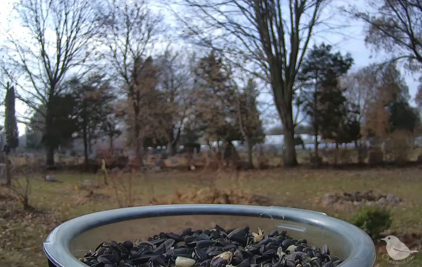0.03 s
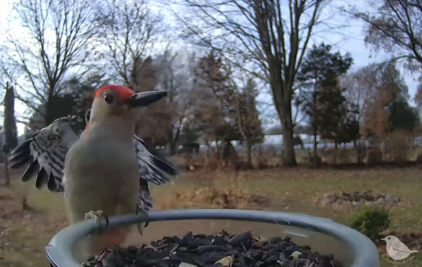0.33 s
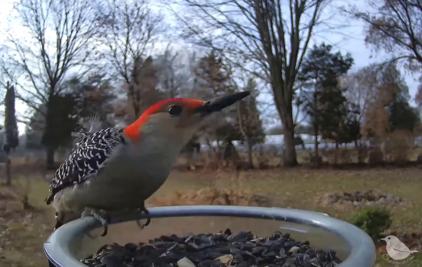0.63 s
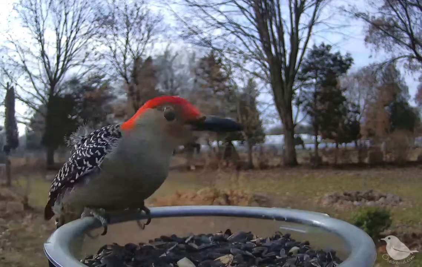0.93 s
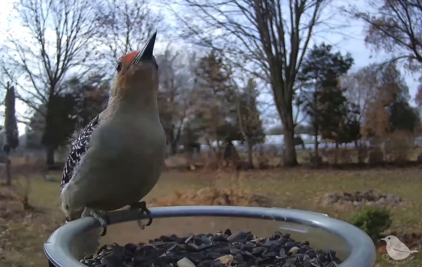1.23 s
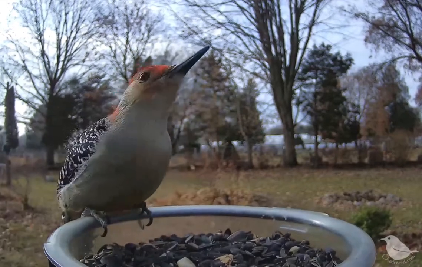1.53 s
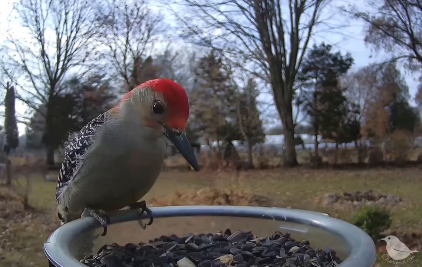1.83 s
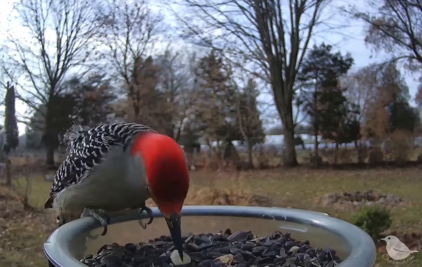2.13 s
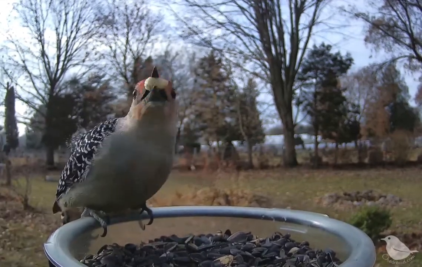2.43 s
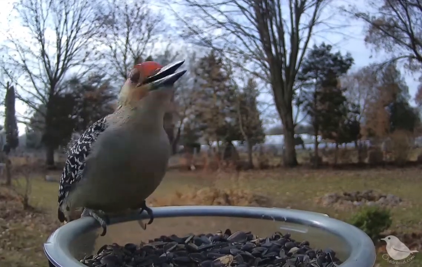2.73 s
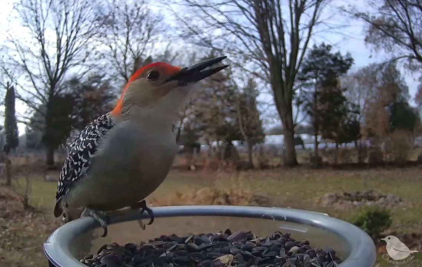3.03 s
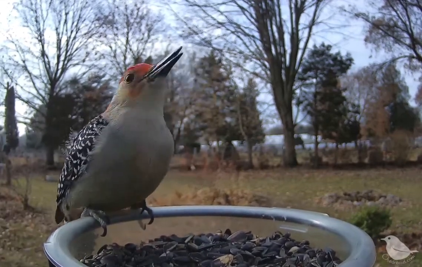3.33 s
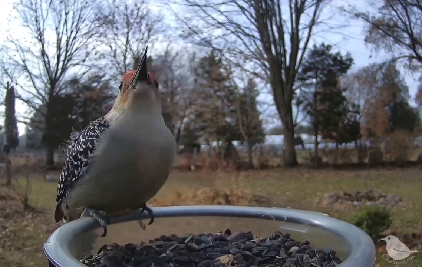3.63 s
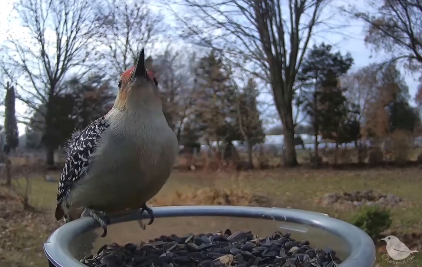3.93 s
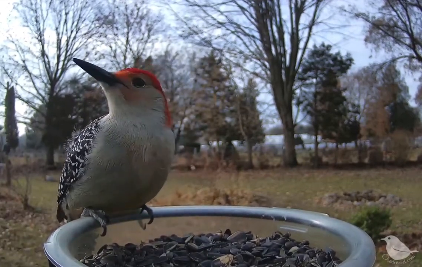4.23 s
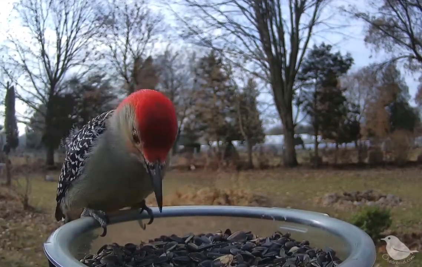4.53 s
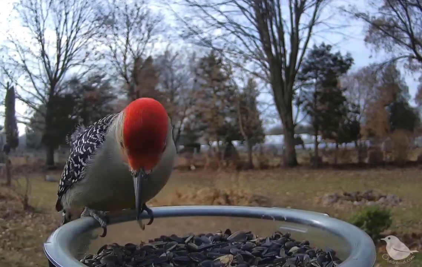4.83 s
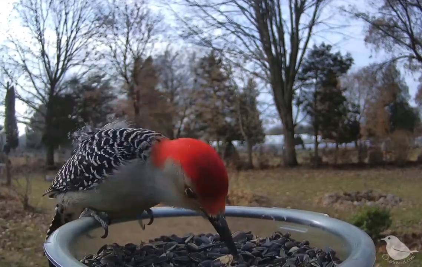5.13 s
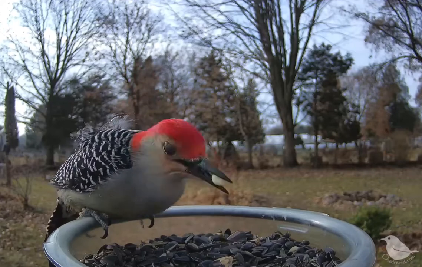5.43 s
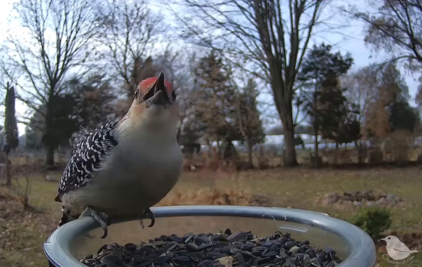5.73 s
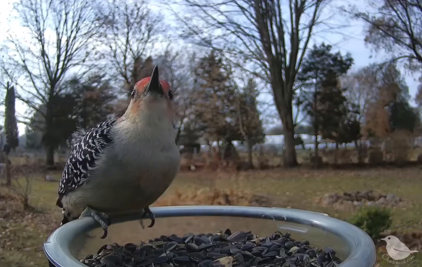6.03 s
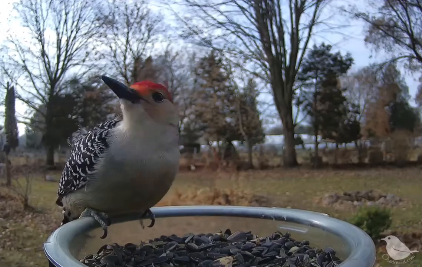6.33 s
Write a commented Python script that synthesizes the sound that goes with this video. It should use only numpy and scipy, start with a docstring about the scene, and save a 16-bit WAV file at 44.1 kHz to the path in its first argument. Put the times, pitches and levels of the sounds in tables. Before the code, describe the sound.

A woodpecker lands on a plastic feeder dish with a brief flutter, low thumps and a loud clatter of claws that overloads the microphone inside the feeder. A claw slips with a short squeak, then the beak taps and stirs seeds in two light spells. Small birds chirp faintly around the yard over a soft wind, a low hum, a far engine and a slowly approaching car. A nearer bird gives two short harsh calls at the end.

```python
"""In a yard, a woodpecker flaps onto the plastic dish of a camera feeder. Its claws strike the rim and
slip once, and its beak picks among the seeds; every contact excites the resonant modes of the dish.
Small birds chirp in the trees and a nearer bird calls harshly, over a light wind, the tyre noise of a
car nearing on a distant road, a far engine and a low hum. The microphone sits in the feeder itself,
passes nothing above the mid treble and overloads on the claws."""
import sys
import numpy as np
from scipy import signal
from scipy.fft import rfft, irfft
from scipy.io import wavfile
from scipy.ndimage import uniform_filter1d

SR = 44100
rng = np.random.default_rng(int(sys.argv[2]) if len(sys.argv) > 2 else 0)


def put_to_file(sound):
    """Save the sound as 16-bit audio at rate SR, in the file named by the first command-line argument."""
    columns = np.atleast_2d(sound).T  # one column per channel
    safe = np.clip(columns, -1, 1)
    whole_steps = np.round(safe * 32767)
    wavfile.write(sys.argv[1], SR, whole_steps.astype(np.int16))


N = 286650
TIME = np.arange(N) / SR
BAND_HZ = 6400  # upper limit of the microphone


def undb(db):
    """Amplitude ratio for a level in decibels."""
    return 10 ** (np.asarray(db) / 20)


def unit(x):
    """Normalisation to an rms of 1."""
    return x / np.sqrt(np.mean(x ** 2) + 1e-18)


def add(out, start, x):
    """Superposition: x is mixed into out from a start in seconds."""
    i = max(int(start * SR), 0)
    out[i:i + len(x)] += x[:N - i]


def walk(rate_hz):
    """Smoothed random fluctuation with a standard deviation near 1."""
    k = max(int(SR / rate_hz), 1)
    steps = np.repeat(rng.standard_normal(N // k + 1), k)
    return 1.5 * uniform_filter1d(uniform_filter1d(steps, k), k)[:N]


def band(x, hz, width_hz):
    """A second-order resonator with unit gain at its centre."""
    return signal.lfilter(*signal.iirpeak(min(hz, SR / 3), hz / width_hz, fs=SR), x)


def noise(colour):
    """Spectral shaping: band-limited noise of rms 1 that follows (Hz, dB) points."""
    hz, db = np.transpose(colour)
    f = np.maximum(np.fft.rfftfreq(N, 1 / SR), 1)
    shape = undb(np.interp(np.log(f), np.log(hz), db))
    limits = (f < BAND_HZ) * np.minimum(f / hz[0], 1) ** 2
    return unit(irfft(rfft(rng.standard_normal(N)) * shape * limits, N))


# Spectrum of the yard's air. Each row: frequency in Hz, relative spectral level in dB.
AIR_SPECTRUM = [(20, -1.5), (35, -5), (55, 1), (110, 1.5), (150, 0.5), (220, -5), (320, -8.5), (480, -11),
                (750, -9), (1100, -5.5), (1700, -8.5), (3000, -9), (4500, -21.5), (6300, -30.5)]
# Soft gusts. Each row: peak time in seconds, width in seconds, rumble change in dB, rush change in dB.
GUSTS = [(2.35, 0.44, -0.5, 2.5), (5.0, 1, 2.5, 0.86)]


def wind(level_db=-32.5, sway_db=0.43, buffet_db=2):
    """Amplitude modulation of noise: the breeze buffets the low rumble and sways the rush above it."""
    air = noise(AIR_SPECTRUM)
    rumble = signal.sosfiltfilt(signal.butter(2, 250, fs=SR, output="sos"), air)
    rumble_db, rush_db = buffet_db * walk(16), sway_db * walk(7)
    for peak, width, rumble_change, rush_change in GUSTS:
        gust = np.exp(-((TIME - peak) / width) ** 2)
        rumble_db += rumble_change * gust
        rush_db += rush_change * gust
    return undb(level_db) * (rumble * undb(rumble_db) + (air - rumble) * undb(rush_db))


# Tones of a far machine. Each row: multiple of the base frequency, level in dB.
HUM_TONES = [(1, -38), (2, -46.5), (3.5, -46.5)]


def hum(base_hz=58.45, rise_hz_per_s=0.42, wander=0.00397, swell_db=1.2):
    """Tones locked to one machine's speed waver together and rise as it slowly speeds up."""
    hz = (base_hz + rise_hz_per_s * TIME) * (1 + wander * walk(2))
    phase = 2 * np.pi * np.cumsum(hz) / SR
    return sum(np.sqrt(2) * undb(db + swell_db * walk(4)) * np.sin(k * phase) for k, db in HUM_TONES)


def engine(firing_hz=80.4, sag_hz_per_s=0.66, idle_db=-43.5, load_db=11.5, octave_db=-18, waver_db=1.5):
    """Periodic firing: a far engine's tone and its octave sag in pitch and swell under load."""
    onset_s, attack_s, hold_s, release_s = 2, 0.57, 1.15, 1.35
    load = np.interp(TIME, np.cumsum([onset_s, attack_s, hold_s, release_s]), [0, 1, 1, 0])
    db = idle_db + load_db * load + waver_db * (1 - load) * walk(3)
    phase = 2 * np.pi * np.cumsum(firing_hz - sag_hz_per_s * TIME) / SR
    return np.sqrt(2) * undb(db) * (np.sin(phase) + undb(octave_db) * np.sin(2 * phase))


# Tyre noise entering the housing. Each row: frequency in Hz, relative spectral level in dB.
TYRE_SPECTRUM = [(200, -8), (600, -12.5), (1150, 3.5), (1500, -1.5), (2050, -2.5), (2400, 2), (2620, 0.5),
                 (2850, 0), (3700, -1.5), (4020, -2.5), (4350, -12.5), (6300, -17.5)]


def car(closest_s=7.08, closest_m=23.8, closest_db=-30.5, speed_m_per_s=14.1, ground_db_per_m=0.15):
    """Spherical spreading and ground absorption: tyre noise grows louder and brighter as a car nears."""
    far_hz, near_hz, spread_octaves, flicker_db = 1330, 2750, 1.03, 0.9
    distance = np.hypot(closest_m, speed_m_per_s * (TIME - closest_s))
    nearness = closest_m / distance * undb(-ground_db_per_m * (distance - closest_m))
    bright_hz = far_hz + (near_hz - far_hz) * nearness ** 2
    spectrum, f = rfft(noise(TYRE_SPECTRUM)), np.fft.rfftfreq(N, 1 / SR)
    tyres, power = 0, 0
    for hz in 200 * 2. ** np.arange(6):
        octave = irfft(spectrum * np.maximum(1 - abs(np.log2((f + 1) / hz)), 0), N)
        weight = np.exp(-.5 * (np.log2(hz / bright_hz) / spread_octaves) ** 2)
        tyres += octave * weight * undb(flicker_db * walk(7.7))
        power += np.var(octave) * weight ** 2
    return undb(closest_db) * nearness * tyres / np.sqrt(power)


def sing(notes, partials, waver=0.11, rasp_hz=900):
    """Harmonic notes made hoarse by random modulation of frequency and amplitude."""
    out, shake, tremble = np.zeros(N), walk(rasp_hz), walk(rasp_hz)
    for start, pitch_hz, swell_db, db, hoarse in notes:
        u = np.linspace(0, 1, len(pitch_hz))
        span = int(start * SR) + np.arange(len(u))
        phase = 2 * np.pi * np.cumsum(pitch_hz * (1 + waver * hoarse * shake[span])) / SR
        voice = sum(undb(partial_db) * np.sin(k * phase) for k, partial_db in partials)
        envelope = undb(swell_db) * np.sqrt(4 * u * (1 - u))
        roughness = 1 + 0.52 * hoarse * tremble[span]
        add(out, start, undb(db) * unit(voice * envelope * roughness))
    return out


# Warbled chirps. Each row: start in seconds, length in seconds, pitch in Hz,
# rise as a fraction of the pitch, level in dB, hoarseness from 0 to 1.
CHIRPS = [(2.079, 0.076, 3500, 0.0495, -33.5, 0.38), (3.522, 0.073, 3310, -0.018, -32, 0.25)]
# A chirp arches, dips and flicks up. Each row: fraction of its length, pitch ratio.
CHIRP_CONTOUR = [(0, 0.97), (0.14, 1.08), (0.42, 0.925), (0.7, 0.98), (1, 1.07)]
# Short whistles. Each row: start in seconds, length in seconds, first and last pitch in Hz,
# level in dB, hoarseness from 0 to 1.
WHISTLES = [(2.343, 0.038, 4150, 4850, -40, 0.35), (2.39, 0.17, 6250, 6100, -48.5, 0.92),
            (3.715, 0.058, 4200, 4200, -44, 0.23), (3.763, 0.093, 4480, 4050, -43, 0.06),
            (5.008, 0.068, 3420, 3240, -31, 0.55), (5.421, 0.042, 3900, 2610, -36.5, 0.05),
            (5.53, 0.026, 4080, 3440, -38.5, 0.2)]


def small_birds(dip_db=-13.5, dip_at=0.38, dip_width=0.18):
    """Frequency modulation of a single tone: chirps warble and weaken at the dip, whistles glide."""
    notes = []
    for start, length, hz, rise, db, hoarse in CHIRPS:
        u = np.linspace(0, 1, int(length * SR))
        pitch_hz = hz * (np.interp(u, *np.transpose(CHIRP_CONTOUR)) + rise * (u - .5))
        swell_db = dip_db * np.exp(-((u - dip_at) / dip_width) ** 2)
        notes.append((start, pitch_hz, swell_db, db, hoarse))
    for start, length, first_hz, last_hz, db, hoarse in WHISTLES:
        notes.append((start, np.linspace(first_hz, last_hz, int(length * SR)), 0, db, hoarse))
    return sing(notes, partials=[(1, 0)])


# Calls of a nearer bird. Each row: start in seconds, length in seconds, fundamental in Hz,
# level in dB, hoarseness from 0 to 1.
CALLS = [(6.012, 0.055, 1300, -27.5, 0.42), (6.303, 0.072, 1370, -21.5, 0.62)]
# Spectrum of a call. Each row: harmonic number, relative level in dB.
CALL_HARMONICS = [(2, 5.5), (3, -1), (4, -14.5)]


def harsh_bird(scoop=0.03, fade_db=-8):
    """Harmonics of a missing fundamental form rasping calls that scoop in pitch and fade."""
    notes = []
    for start, length, hz, db, hoarse in CALLS:
        u = np.linspace(0, 1, int(length * SR))
        pitch_hz = hz * (1 + scoop * np.cos(2 * np.pi * np.sqrt(u)))
        notes.append((start, pitch_hz, fade_db * u, db, hoarse))
    return sing(notes, CALL_HARMONICS, waver=0.114, rasp_hz=950)


def birds(echo_s=0.087, echo_db=-11, t60=.33, tail_db=-8):
    """Reflection and scattering: the voices return as an echo across the yard and a tail from trees."""
    voices = small_birds() + harsh_bird()
    t = TIME[:SR // 2]
    trees = rng.standard_normal(len(t)) * np.exp(-np.log(1000) * t / t60)
    echo = np.interp(TIME - echo_s, TIME, voices)
    tail = signal.fftconvolve(voices, trees / np.linalg.norm(trees))[:N]
    return voices + undb(echo_db) * echo + undb(tail_db) * tail


# Rush of the feathers. Each row: frequency in Hz, relative spectral level in dB.
FEATHER_SPECTRUM = [(25, 11), (90, -8.5), (250, -1.5), (500, -3), (1100, -9), (1700, -11), (2800, -5.5),
                    (4200, -11), (6300, -17.5)]
# The bird's weight and wing puffs shove the feeder.
# Each row: start in seconds, level in dB, frequency in Hz, time to decay by 60 dB in seconds.
THUMPS = [(0.116, -16, 44.5, 0.056), (0.175, -8.5, 205, 0.032), (0.176, -8, 55, 0.055),
          (0.2974, -6.5, 85, 0.033)]


def landing(fold_s=0.3, wings_db=-21, wingbeat_hz=18.1, wingbeat_db=2.5, flutter_db=1.5):
    """Wingbeats modulate feather noise until the wings fold; shoves start damped feeder vibrations."""
    rise_db_per_s, fall_db_per_s = 51.5, 195
    since_fold = TIME - fold_s
    effort_db = wings_db + np.minimum(rise_db_per_s * since_fold, -fall_db_per_s * since_fold)
    beat_db = wingbeat_db * np.cos(2 * np.pi * wingbeat_hz * since_fold)
    out = noise(FEATHER_SPECTRUM) * undb(effort_db + beat_db + flutter_db * walk(159))
    t = TIME[:SR // 4]
    for start, db, hz, t60 in THUMPS:
        add(out, start, -undb(db) * np.sin(2 * np.pi * hz * t) * np.exp(-np.log(1000) * t / t60))
    return out


# Modes of the plastic dish. Each row: frequency in Hz, bandwidth in Hz, gain in dB.
DISH_MODES = [(530, 200, -9.5), (980, 100, -5), (1130, 170, 6.5), (1596, 410, -9.5), (2067, 105, 2.5),
              (2244, 100, -1.5), (2526, 180, -1), (2823, 100, 4), (3180, 110, -2), (3280, 100, -5),
              (3390, 86, -0.5), (3770, 120, 0), (4220, 135, -1.5), (4540, 130, -2.5), (4950, 130, -13.5),
              (5630, 160, -23), (5600, 180, -21), (6500, 180, -21)]


def dish(force, direct, spot_db=0):
    """Modal resonance: the spot touched weights each mode, and some contact noise arrives directly."""
    weights_db = spot_db * rng.standard_normal(len(DISH_MODES))
    ring = sum(undb(db + weight_db) * band(force, hz, width)
               for (hz, width, db), weight_db in zip(DISH_MODES, weights_db))
    return ring + direct * band(force, 2100, 4400)


def contacts(rows, direct, q, grit_db):
    """Impulsive excitation: a sharp tick and a dying burst of tiny catches ring the dish."""
    out, t = np.zeros(N), TIME[:SR // 10]
    for start, db, length, hz in rows:
        catches = rng.standard_normal(len(t))
        grit = undb(grit_db * np.repeat(rng.standard_normal(len(t)), 10)[:len(t)])
        force = catches * grit * np.exp(-(t / length) ** 2)
        force[0] += 4  # the tick
        hit = dish(band(force, hz, hz / q), direct, spot_db=3.5)
        contact_rms = np.sqrt(np.mean(hit[t < length + .001] ** 2))
        add(out, start, undb(db) * hit / contact_rms)
    return out


def scatter(spells):
    """A jittered pulse train: rows of light contacts at uneven times and strengths in each spell."""
    rows = []
    for start, end, rate, db, length, hz in spells:
        for k, (late, extra_db) in enumerate(rng.uniform((0, -3), (1, 3), (64, 2))):
            onset = start + (k + late) / rate
            if onset < end:
                rows.append((onset, db + extra_db, length, hz))
    return rows


# Beak on seeds. Each row: start in seconds, level in dB, length in seconds, centre of the force in Hz.
PECKS = [(1.9952, -18, .0018, 5800), (1.997, -25, 0.0042, 2000), (2.0918, -31.5, .002, 4630),
         (2.1675, -32.5, 0.005, 4400), (3.030, -37, 0.003, 5000), (5.1265, -29.5, 0.0054, 4300),
         (5.136, -32, 0.006, 4300), (5.198, -37, 0.0037, 5400), (5.3095, -38, 0.0023, 4400),
         (5.4675, -28.5, 0.0017, 4600)]
# Seeds shifting. Each row: start and end in seconds, touches per second, level in dB,
# length of a touch in seconds, centre of the force in Hz.
RUMMAGE = [(5.105, 5.25, 80, -44.5, 0.0068, 5500)]


def beak():
    """Granular impacts: the beak picks and stirs the seeds, whose crunches excite the dish."""
    return contacts(PECKS + scatter(RUMMAGE), direct=0.55, q=2.9, grit_db=4.5)


def claw_slip(start_s=0.915, pressed_db=-5, light_hz=861.6, pressed_hz=1176, jitter=.17, scatter_db=3):
    """Stick-slip friction: a claw's uneven jerks drive the dish, faster and harder with pressure."""
    attack_s, hold_s, touch_db, release_db_per_s = 0.009, 0.014, -10, 828
    t = TIME - start_s
    pressure_db = touch_db * np.clip(1 - t / attack_s, 0, 1)
    pressure_db -= release_db_per_s * np.clip(t - attack_s - hold_s, 0, 1)
    db = pressed_db + pressure_db
    rate_hz = light_hz + (pressed_hz - light_hz) * undb(pressure_db)
    cycles = np.cumsum(rate_hz * (1 + jitter * walk(1100))) / SR
    jerks = np.flatnonzero(np.diff(np.floor(cycles)))
    force = 0.3 * band(rng.standard_normal(N), 2700, 2400)  # grit between the jerks
    force[jerks] += undb(scatter_db * rng.standard_normal(N // 10))[:len(jerks)]
    # below -6 dB the touch is light and the jerks are rounder
    hardness = np.minimum(undb((db + 6) / 2), 1)
    rounded = signal.sosfilt(signal.butter(1, 2600, fs=SR, output="sos"), force)
    squeak = dish(hardness * force + (1 - hardness) * rounded, direct=0.14)
    squeak = signal.sosfilt(signal.butter(2, 300, "high", fs=SR, output="sos"), squeak)
    # pressure sets the strength, however the jerks line up with the modes
    running_rms = np.sqrt(uniform_filter1d(squeak ** 2, size=260) + 1e-12)
    return squeak / running_rms * undb(db) * (t > 0)


# Claws on the rim. Each row: start in seconds, level in dB, length in seconds, centre of the force in Hz.
CLAW_STRIKES = [(0.1745, -5, 0.0026, 1900), (0.2362, -2.5, 0.0059, 2900), (0.2594, -6, 0.0026, 4050),
                (0.2824, 0, 0.0054, 3730), (0.289, -6.5, 0.0066, 2920), (0.297, -15, 0.0021, 1980),
                (0.910, -21, .003, 2000)]
# Scrabbling for a hold. Each row: start and end in seconds, touches per second, level in dB,
# length of a touch in seconds, centre of the force in Hz.
SCRABBLE = [(0.19, 0.215, 110, -21, .003, 2500), (0.241, 0.279, 210, -16.5, 0.0043, 5000),
            (0.305, 0.34, 76, -23, 0.003, 3100)]


def claws():
    """Broadband impacts: claws strike and scrabble on the rim, exciting many modes at once."""
    return contacts(CLAW_STRIKES + scatter(SCRABBLE), direct=0.38, q=0.92, grit_db=2.5)


def scene():
    """Superposition of the woodpecker and the yard behind it, in one channel."""
    woodpecker = claws() + beak() + claw_slip() + landing()
    yard = birds() + wind() + car() + engine() + hum()
    return (woodpecker + yard)[None]


def record(dry, wake_s=0.072, headroom=1.06, top_hz=16000):
    """Clipping and band limiting: the microphone wakes and overloads; filter overshoot clips again."""
    awake = np.clip((TIME - wake_s) / 0.024, 0, 1)
    overloaded = np.clip(dry * awake, -headroom, headroom)
    lowpass = signal.firwin(601, BAND_HZ, fs=SR, window=("kaiser", 8))
    narrow = signal.fftconvolve(overloaded, lowpass[None], mode="same")
    return signal.sosfilt(signal.ellip(8, .2, 70, top_hz, fs=SR, output="sos"), np.clip(narrow, -1, 1))


dry = scene()
out = record(dry)
put_to_file(out)
```